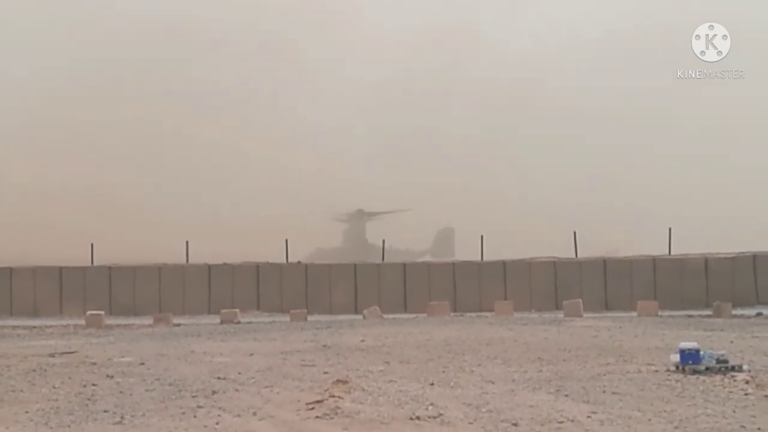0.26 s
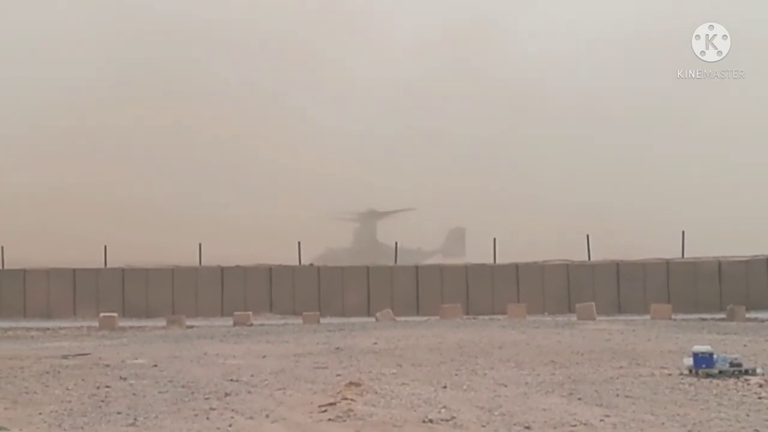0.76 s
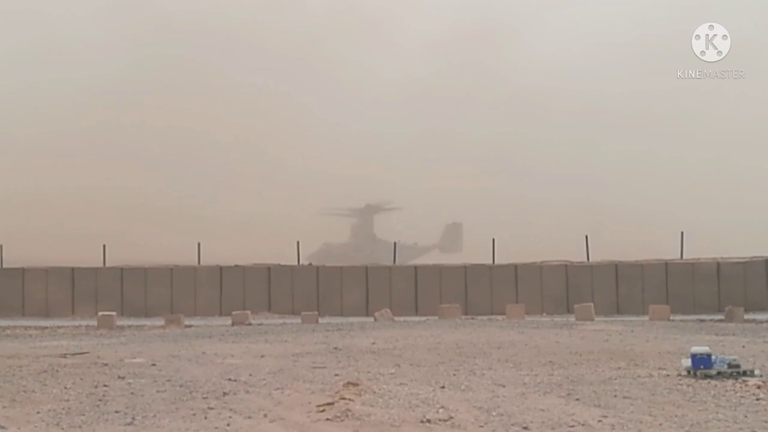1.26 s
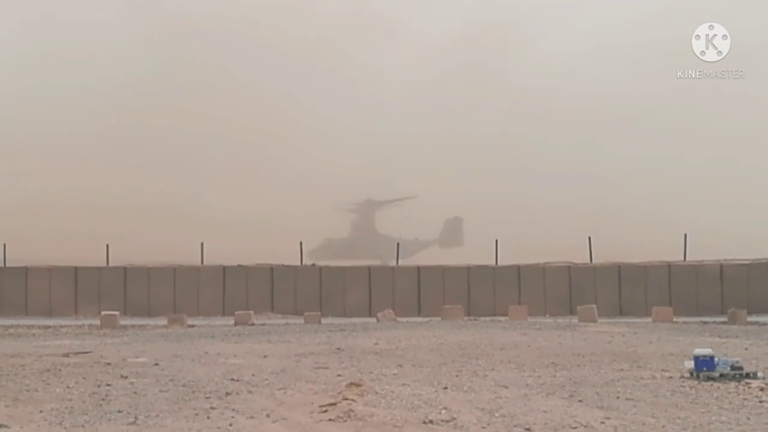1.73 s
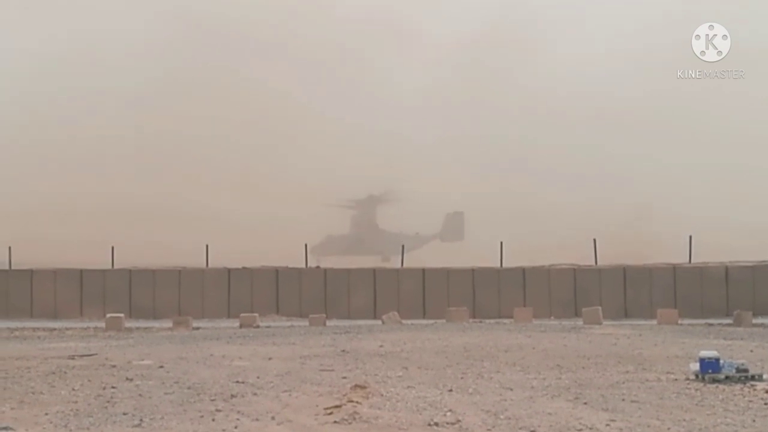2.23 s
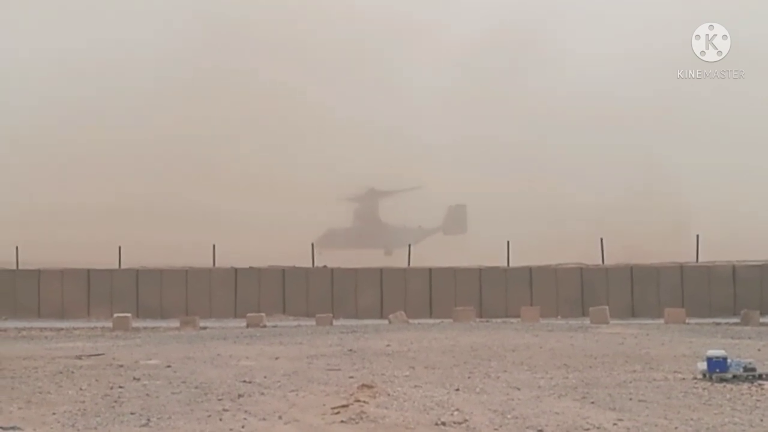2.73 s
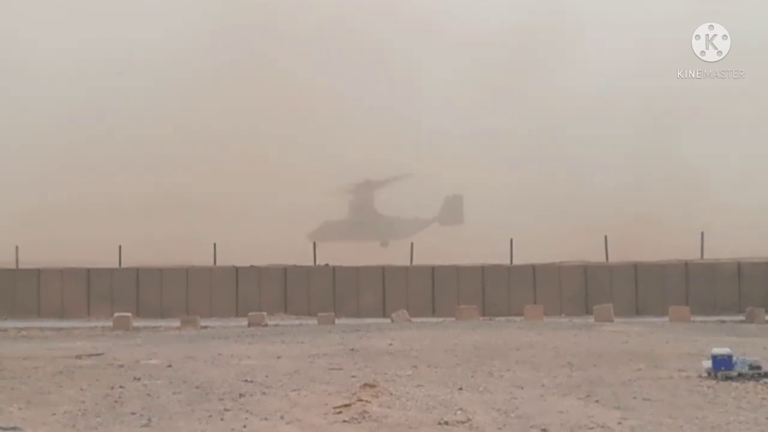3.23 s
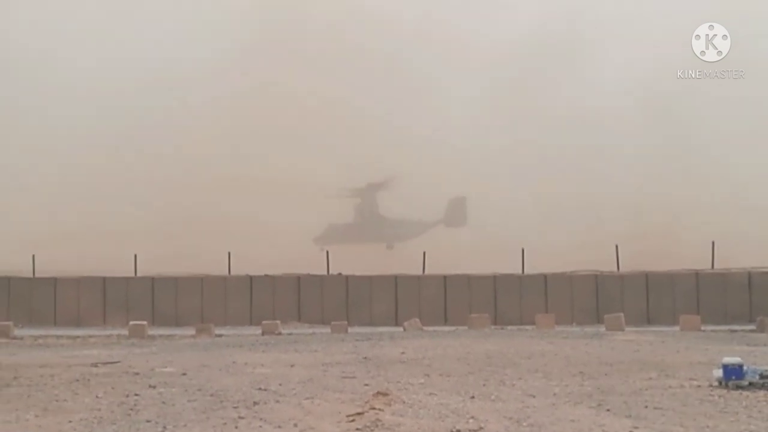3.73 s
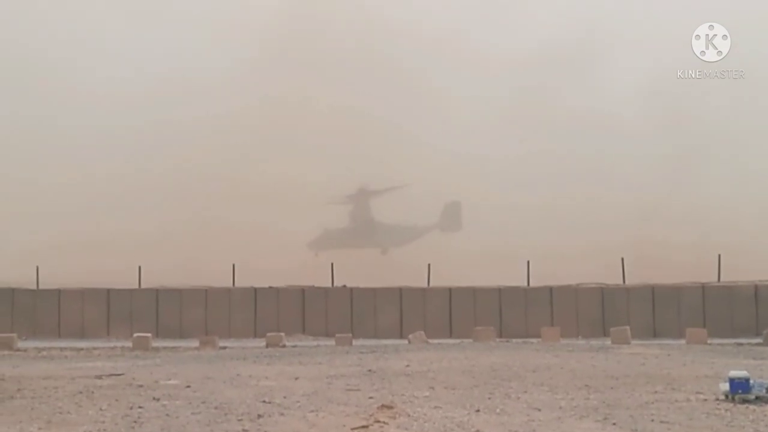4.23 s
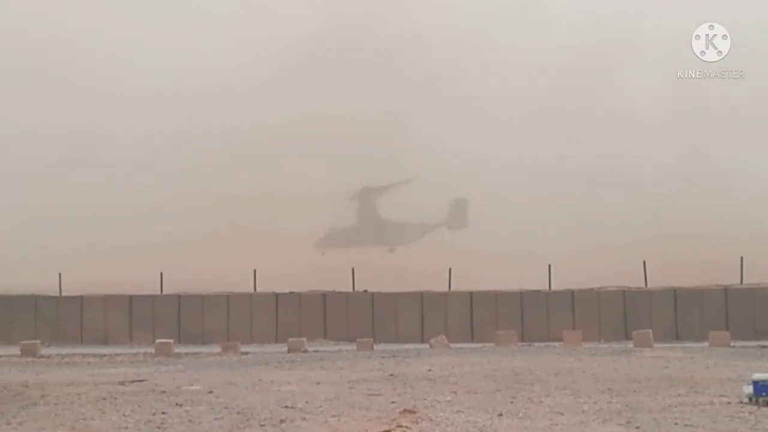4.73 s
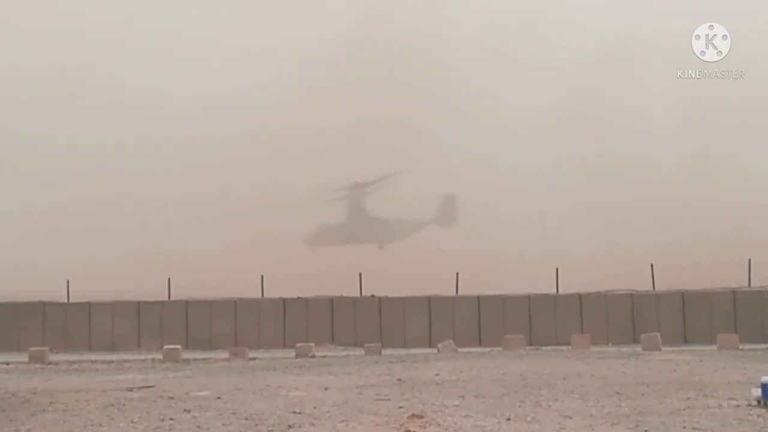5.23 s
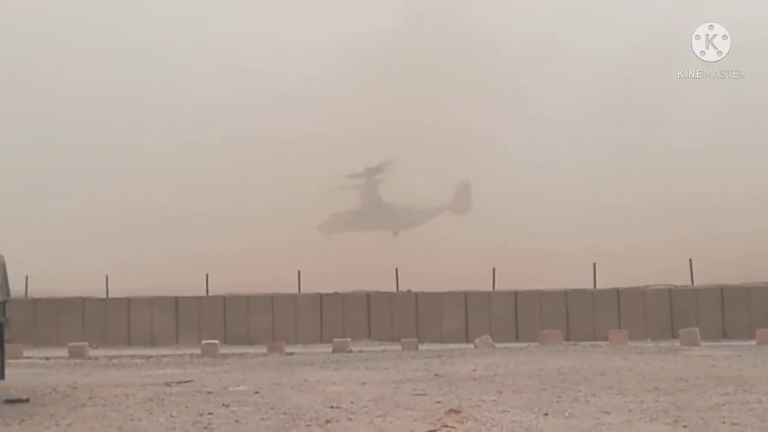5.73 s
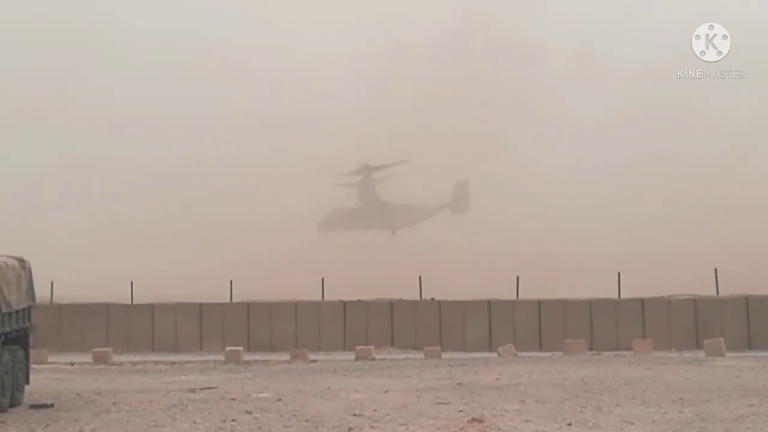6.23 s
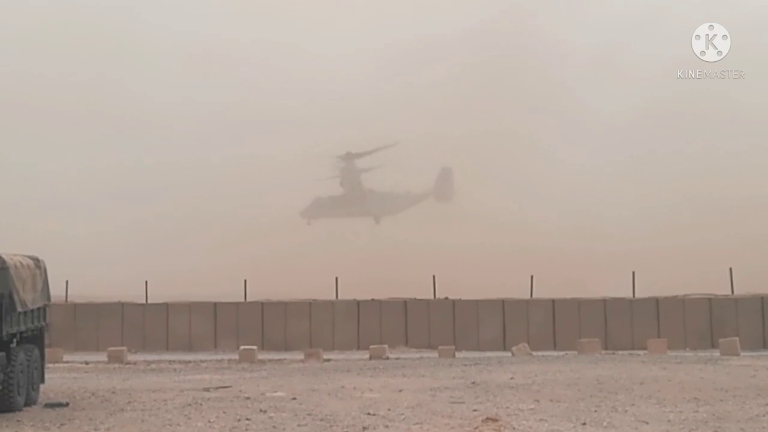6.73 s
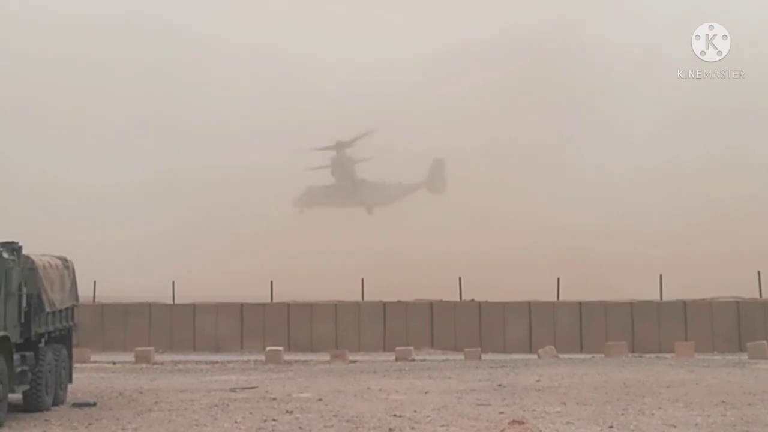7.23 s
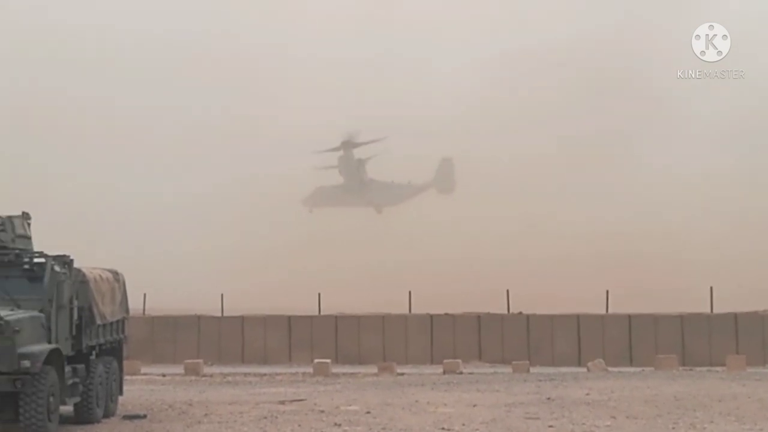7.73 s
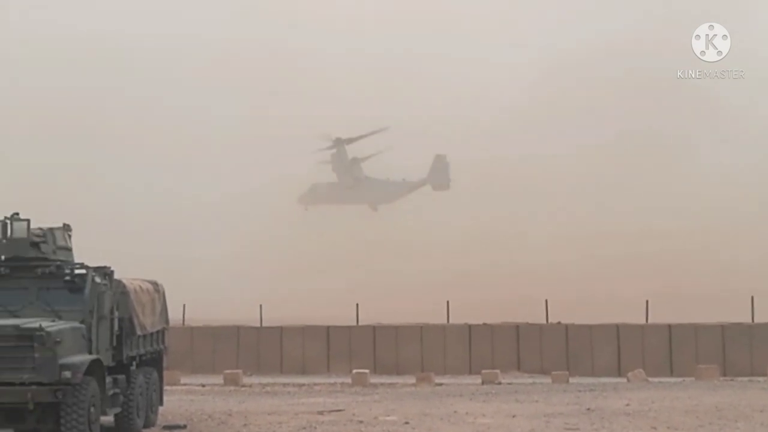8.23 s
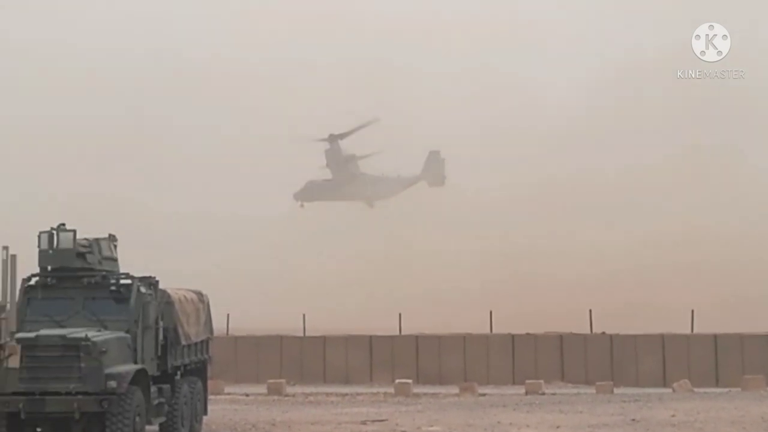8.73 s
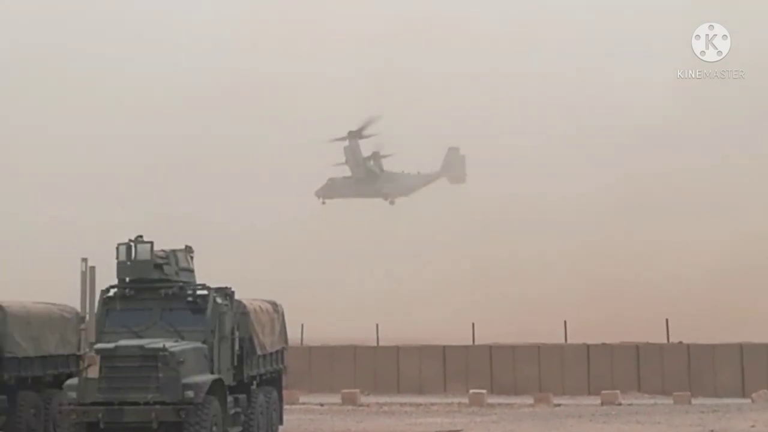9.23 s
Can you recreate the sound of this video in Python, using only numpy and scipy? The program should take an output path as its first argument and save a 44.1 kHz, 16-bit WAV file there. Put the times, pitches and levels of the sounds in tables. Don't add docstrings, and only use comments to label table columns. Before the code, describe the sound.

A tiltrotor lifts off outdoors, its rotors thumping and slapping about twenty times a second over a rough engine roar that grows later.

```python
import sys
import numpy as np
from scipy import signal
from scipy.fft import rfft, irfft, next_fast_len
from scipy.io import wavfile
from scipy.ndimage import uniform_filter1d, minimum_filter1d

SR = 44100
rng = np.random.default_rng(int(sys.argv[2]) if len(sys.argv) > 2 else 0)


def boost(x):
    u = np.asarray(x, float) / 20
    return 10 ** u


def unload_audio(sound):
    columns = np.transpose(np.atleast_2d(sound))
    steps = np.round(np.clip(columns, -1, 1) * 32767)
    wavfile.write(sys.argv[1], SR, steps.astype(np.int16))


N = 417627

BLADE_HZ = 20.67
# (time [s], delay after the blade pass [ms])
THUMP_DELAY = [(0.0, 29.2), (0.4, 29.2), (0.8, 31.2), (1.6, 31.6), (3.2, 33.1), (4.4, 37.5), (5.2, 43.0),
               (5.6, 48.1), (6.8, 56.9), (7.6, 59.6), (8.4, 64.3), (9.2, 76.3), (9.47, 78.9)]
# (time [s], level [dB], lag of the far rotor behind the near one [ms])
ROTORS = [(0.0, -24.5, 10), (0.27, -28.5, 12.4), (1.02, -27.5, 11.5), (1.24, -29, 8.2), (1.55, -32, 14.73),
          (2.34, -34, 12), (2.89, -32.5, 11), (3.66, -33.5, 12.2), (3.88, -30.5, 10.6), (5.3, -33, 13),
          (5.77, -33.5, 12.36), (6.48, -33.5, 18), (7.14, -30, 23.2), (7.43, -31.5, 15.6),
          (7.9, -29, 17.26), (7.97, -31, 22.7), (9.06, -32.5, 24), (9.47, -30, 21.33)]
FIRST_ORDER_DB = -40.5
OVERTONE_DB = [-4.5, 0.0, -2, -3]
OVERTONE_TURNS = [-.27, -.22, -.15, -.19, -.3]
FAR_SHARE, FAR_TURNS = 0.5, -0.1

# (time [s], lag [ms], peak of the boom under it [dB])
SLAP_LAG = [(0.0, 17.4, -19.1), (0.2, 13.6, -31), (0.5, 18.5, -28.0), (0.9, 16, -22), (1.25, 16.6, -16.0),
            (2.0, 15, -23.5), (2.6, 15, -36), (3.3, 11.9, -33), (4.0, 11.4, -29), (4.8, 19.8, -48),
            (5.4, 18, -38), (6.25, -1, -26), (6.5, 12.8, -29), (7.0, 13, -32), (7.5, 17.5, -23.0),
            (7.9, -1, -23.9), (8.3, 2, -25.5), (8.9, 13, -31)]
# (centre [s], slap peak [dB], half length [s], ring [Hz])
SPELLS = [(0.0, 17.5, 0.034, 220), (0.112, -4, 0.074, 225), (0.636, -12, 0.12, 165),
          (0.796, -13, 0.14, 225), (0.995, -6, 0.065, 175), (1.293, -4, 0.13, 157), (1.48, -4, .08, 162),
          (1.648, -4.5, 0.1, 234), (1.935, -2, 0.096, 228), (2.344, -9.5, 0.28, 222),
          (2.625, -11, 0.066, 221), (2.88, -11, 0.22, 249), (3.396, -6, .16, 232), (3.722, -14, 0.15, 250),
          (3.97, -9.5, 0.083, 229), (4.202, -17, 0.12, 243), (4.592, -22, 0.15, 250),
          (4.886, -21, 0.1, 242), (5.238, -18, 0.059, 242), (5.526, -17.5, 0.099, 215),
          (5.77, -20, 0.12, 240), (6.082, -13.5, 0.11, 253), (6.242, -13, 0.073, 230),
          (6.736, -12, 0.11, 250), (7.124, -17, 0.19, 207), (7.548, -9, 0.15, 215), (7.874, -13, .07, 158),
          (8.314, -18, 0.16, 172), (8.799, -24.5, 0.14, 170), (9.403, -17, 0.059, 194)]
SPELL_EDGE_DB, CALM_DB = 5.5, -24.5
# (time [s], peak [dB], hiss above peak [dB])
STRIKES = [(0.042, -12, -24), (0.092, -12, -9), (0.14, -11.5, -12), (0.186, -9, -21), (0.234, -16, -18),
           (0.913, -15, -19.5), (1.015, -12.5, -14), (1.104, -12, -7), (1.153, -7, -17), (1.251, -12, -13),
           (1.497, -13, -20), (1.545, -14, -4.5), (1.595, -14, -19.5), (1.641, -21, -19), (1.69, -16, -19),
           (1.787, -17.5, -8), (2.899, -18, -15.5), (2.995, -18, -20), (3.044, -17.5, -18),
           (3.186, -12.5, -25), (3.282, -10, -28.5), (3.332, -17, -18.5), (3.43, -16, -12.5),
           (3.584, -18.5, -6.5), (5.659, -15, -18), (6.37, -14, -17.5), (7.135, -12.5, -15),
           (7.235, -8, -23), (7.279, -8, -18), (7.326, -9.5, -23)]

# (time [s], engine roar [dB], fullness [dB], downwash [dB])
POWER = [(0.0, -29, 0, 3.5), (.15, -34, -3, 8), (.45, -34.5, -1.5, 2), (.95, -32.5, -1, -0.5),
         (1.3, -31.5, -4, 4.5), (1.8, -33.5, 1.5, 1.5), (2.2, -35.5, -3, 0.5), (2.7, -35.5, -2, -0.5),
         (3.05, -33.5, 2.5, -2.5), (3.8, -33, -2, -1.5), (4.6, -33, 0.5, -3.5), (5.1, -31, 0, -1.5),
         (5.9, -30, -1, 1.5), (6.8, -29, -2, 1.5), (7.3, -28.5, 1, 0), (7.85, -26.5, 0.5, 0),
         (8.8, -29.5, 0.5, -4), (9.47, -27, 1, -0.5)]
# (level at a roar of -33 [dB], then [dB per dB] of roar, fullness, downwash, slap)
FOLLOW = [
    (-27, 0.25, 0.18, 0.79, .1),
    (-37.5, 1.5, 1, .05, .1),
    (-34.5, 1.03, .1, 0.032, 0.034),
    (-39.0, 1.15, -.1, 0.065, .05),
]
# (centre [s], rise [dB], half length [s], brightness [-1 to 1])
GUSTS = [(0.694, 2, 0.054, -0.15), (1.177, 5, .08, .1), (1.592, 4.5, 0.076, -.1), (3.002, 0, 0.11, -0.55),
         (3.292, 1, 0.14, -.3), (4.044, 3.5, 0.081, 0.16), (5.15, 2, 0.12, 0.59), (5.393, 2, 0.11, 0.27),
         (6.356, 1, 0.11, -0.31), (7.249, 1.5, 0.079, -0.62), (7.782, 5.5, .02, 0.37),
         (7.868, 5, 0.028, -.1), (8.19, 3.5, 0.027, 0.3), (8.261, 2.5, 0.046, -0.33), (8.56, 1, .04, 0.55),
         (8.712, 4, .04, .6), (8.834, 3, 0.019, 0.85), (9.024, 1.5, .04, 0.35), (9.247, 2, 0.029, 0.15)]
# (plain share [dB per dB], share per brightness [dB per dB])
GUST_SHARE = [
    (0.27, .05),
    (1.06, -1.3),
    (0.74, 0.77),
    (0.37, 0.0061),
]
BAND_EDGES_HZ = [450, 1000, 1700, 5200]

# (frequency [Hz], density [dB])
MID_COLOUR = [(25, -55.5), (70, -45.5), (130, -33), (270, -35.5), (340, -42.5), (450, -52.5), (800, -49),
              (1300, -48), (2100, -55), (4500, -64), (5500, -75.5), (7500, -76.5), (10000, -95),
              (15000, -118)]
# (frequency [Hz], width [Hz], height [dB])
ECHO_DIPS = [(426, 23, 4.5), (473.3, 36, -6.5), (779, 165, 5.5), (997, 58, -5), (1317, 285, 5.5),
             (1677, 150, -2.5), (2046, 170, 2), (2525, 540, -5.5), (3416, 220, 3.5), (3960, 160, 3.5),
             (6670, 290, 3)]
# (frequency [Hz], density [dB])
SIDE_COLOUR = [(60, -70), (200, -57.5), (300, -51.5), (430, -49.5), (490, -58), (930, -51), (1700, -55.5),
               (2700, -61), (3000, -64.5), (5100, -68.5), (5500, -74.5), (8000, -78.5), (10000, -92.5),
               (15000, -115)]
# (frequency [Hz], level [dB])
PULSE_SIDE = [(60, -36.5), (250, -20.5), (410, -14)]


def thump():
    t = np.arange(N) / SR
    turns = BLADE_HZ * (t - columns(THUMP_DELAY, t)[0] / 1000)
    level_db, lag_ms = columns(ROTORS, t)
    out = np.sqrt(2) * boost(FIRST_ORDER_DB) * np.cos(2 * np.pi * (turns + OVERTONE_TURNS[0]))
    for order, db, phase in zip(range(2, 6), OVERTONE_DB, OVERTONE_TURNS[1:]):
        far_phase = order * BLADE_HZ * lag_ms / 1000 + FAR_TURNS
        both_rotors = abs(1 + FAR_SHARE * np.exp(2j * np.pi * far_phase))
        gain = np.sqrt(2) * boost(level_db + db) * both_rotors
        out += gain * np.cos(2 * np.pi * (order * turns + phase))
    return out


def blade_passes():
    thumps = np.arange(-2, N / SR * BLADE_HZ) / BLADE_HZ
    thumps = thumps + columns(THUMP_DELAY, thumps)[0] / 1000
    lag_ms, boom_db = columns(SLAP_LAG, thumps)
    times = thumps + lag_ms / 1000
    peak_db, hz = slap_at(times)
    path_ms = columns(THUMP_DELAY, times)[0] - 30
    crack_db = 9 + 0.28 * (peak_db + 5) - 0.14 * path_ms
    return thumps, times, boom_db, peak_db, hz, crack_db


def slap_at(t):
    s, peak_db, half, hz = np.transpose(SPELLS)[..., None]
    spell_db = peak_db - SPELL_EDGE_DB * ((t - s) / half) ** 2
    power = boost(2 * np.maximum(spell_db, -150))
    total = power.sum(0)
    return 10 * np.log10(total + boost(2 * CALM_DB)), (power * hz).sum(0) / total


def slaps(thumps, times, boom_db, peak_db, hz):
    peak_db = np.minimum(peak_db, -1.5)
    main = rings(times - 0.0015, peak_db + 0.94, hz, length=0.0028, turns=-0.21, jitter_db=1.3)
    back = rings(times + 0.01027, peak_db - 22.5, hz, length=0.005, turns=0.12, jitter_db=5.5)
    boom = rings(thumps + 0.01362, boom_db - 0.8, 6 * BLADE_HZ, length=0.013, turns=-0.15, jitter_db=0.7)
    edge = rings(thumps + 0.0013, -30.0, 193.0, length=0.0025, turns=0.027, jitter_db=0.5)
    return main + back + boom + edge


def rings(times, peak_db, hz, length, turns, jitter_db):
    u = np.arange(-1500, 1500) / SR
    chance = rng.standard_normal((len(times), 3))
    drift = evened(uniform_filter1d(chance[:, 0], size=12))
    hz = (hz * (1 + 0.012 * chance[:, 1]))[:, None]
    bell = np.exp(-0.5 * (u / length) ** 2)
    wave = bell * np.cos(2 * np.pi * (hz * u + turns + 0.045 * drift[:, None]))
    wave = signal.sosfilt(signal.cheby1(5, 1.5, 325, fs=SR, output="sos"), wave)
    return laid_out(times, u, boost(peak_db + jitter_db * chance[:, 2])[:, None] * wave)


def strikes():
    s, peak_db, hiss_db = np.transpose(STRIKES)
    u = np.arange(900) / SR
    hiss_peak_db = peak_db + hiss_db
    bands_db = [peak_db - 106, peak_db - 5, peak_db - 5.0, hiss_peak_db - 1.5, hiss_peak_db - 22.5]
    powers = [laid_out(s, u, boost(2 * db)[:, None] * crack_shape(u, 0, 0.002)) for db in bands_db]
    snaps = [laid_out(s + 0.0018, u[:1], boost(db + 11)[:, None]) for db in bands_db]
    return powers, snaps


def crack_shape(u, onset, decay):
    since = np.clip(u - onset, 0, None)
    return (1 - np.exp(-since / 0.00044)) * np.exp(-since / decay)


def blade_swell(times, crack_db):
    u = np.arange(-900, 1600) / SR
    strength = np.clip(boost(2 * crack_db) - 1.2, 0, None)[:, None]
    luck = boost(1.4 * rng.standard_normal((len(times), 2)))
    crack = 1.3 * luck[:, :1] * crack_shape(u, -0.0035, 0.0054)
    broad = 0.18 * luck[:, 1:] * np.exp(-0.5 * ((u - 0.003) / 0.0085) ** 2)
    return laid_out(times, u, strength * (crack + broad))


def roar(swell, bursts, snaps):
    shared = 0.5
    white = patchy_noise(shared)
    edges = [0, *BAND_EDGES_HZ, SR]
    t = np.arange(0, N / SR + 0.01, 0.01)
    levels_db = [np.interp(np.arange(N) / SR, t, db) for db in roar_db(t)]
    levels_db[0] = np.minimum(levels_db[0], -20)
    levels_db.append(-54.0 + 0.52 * (levels_db[-1] + 39.5))
    throb_shares = [1.03, 3.0, 1.6, 0.57, 0.28]
    hz = np.fft.rfftfreq(8192, 1 / SR)
    out = np.zeros((2, N))
    for lo, hi, db, share, burst, snap in zip(edges, edges[1:], levels_db, throb_shares, bursts, snaps):
        power = 1 + share * swell + burst / boost(2 * db)
        usual = uniform_filter1d(power, size=round(2 * SR / BLADE_HZ))
        source = white * np.sqrt(power / usual) * boost(db) + snap * np.array([[1], [shared]])
        band = coloured(source, lambda f: ear_colours(f) * (f >= lo) * (f < hi))
        in_band = (hz >= lo) * (hz < hi)
        out += band / np.sqrt(np.mean(ear_colours(hz)[0] ** 2 * in_band))
    return out


def patchy_noise(shared):
    frames = N // 128 + 9
    a, b, c, d, patches = rng.standard_normal((frames, 257, 5)).T
    patches = uniform_filter1d(patches, size=6, axis=0)
    patches = evened(uniform_filter1d(patches, size=9, axis=1))
    flutter = evened(uniform_filter1d(rng.standard_normal(frames), size=5))
    mid = a + 1j * b
    side = shared * 1j * mid + np.sqrt(1 - shared ** 2) * (c + 1j * d)
    z = np.array([mid, side]) * boost(1.1 * patches + 0.58 * flutter)
    return evened(signal.istft(z, nperseg=512, noverlap=384)[1][:, :N])


def roar_db(t):
    power_db, full_db, wash_db = columns(POWER, t)
    s, rise_db, half, bright = np.transpose(GUSTS)[..., None]
    gusts_db = rise_db * np.exp(-0.5 * ((t - s) / half) ** 2)
    slap_db = uniform_filter1d(slap_at(t)[0], size=15) + 15
    levels = []
    for (base, a, b, c, d), (plain, per_bright) in zip(FOLLOW, GUST_SHARE):
        steady = base + a * (power_db + 33) + b * full_db + c * wash_db + d * slap_db
        levels.append(steady + ((plain + per_bright * bright) * gusts_db).sum(0))
    return levels


def ear_colours(hz):
    dips_db = sum(db * np.exp(-0.5 * ((hz - f) / (0.5 * width)) ** 2) for f, width, db in ECHO_DIPS)
    return boost(np.array([read(MID_COLOUR, hz) + dips_db, read(SIDE_COLOUR, hz)]))


def evened(x):
    return x / np.sqrt(np.mean(x ** 2) + 1e-20)


def read(points, hz):
    f, value = np.transpose(points)
    return np.interp(np.log(hz + 1), np.log(f + 1), value)


def columns(rows, t):
    s, *rest = np.transpose(rows)
    return np.array([np.interp(t, s, c) for c in rest])


def coloured(x, gain):
    size = next_fast_len(N + 8192)
    return irfft(rfft(x, size) * gain(np.fft.rfftfreq(size, 1 / SR)), size)[..., :N]


def laid_out(times, u, shapes):
    at = np.round((times[:, None] + u) * SR).astype(int)
    inside = (at >= 0) & (at < N)
    return np.bincount(at[inside], shapes[inside], N)


def scene():
    thumps, times, boom_db, peak_db, hz, crack_db = blade_passes()
    pulses = thump() + slaps(thumps, times, boom_db, peak_db, hz)
    mid, side = roar(blade_swell(times, crack_db), *strikes())
    side = side + coloured(pulses, lambda f: 1j * boost(read(PULSE_SIDE, f)))
    return mid + pulses + np.array([side, -side])


def band_limit(x):
    return signal.sosfilt(signal.butter(12, 15140, fs=SR, output="sos"), x)


def record(dry):
    room = np.minimum(1, 0.96 / (abs(dry).max(0) + 1e-9))
    room = minimum_filter1d(room, size=301)
    held = dry * uniform_filter1d(room, size=301)
    fade = np.clip((N - np.arange(N)) / 200, 0, 1)
    return band_limit(held * fade)


dry = scene()
out = record(dry)
unload_audio(out)
```